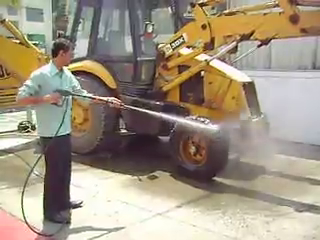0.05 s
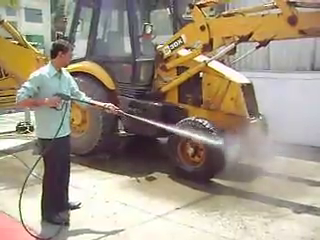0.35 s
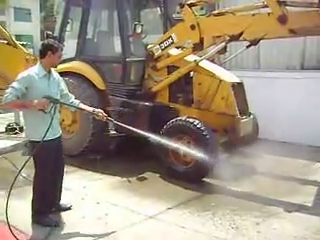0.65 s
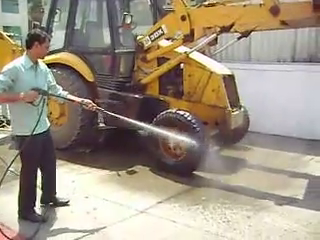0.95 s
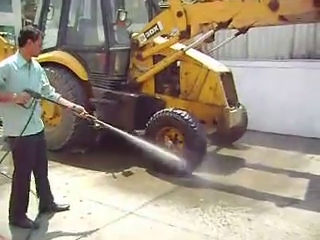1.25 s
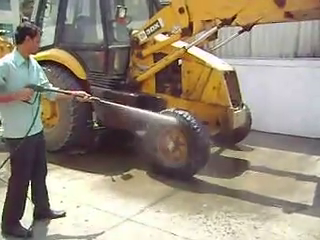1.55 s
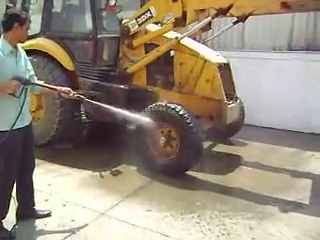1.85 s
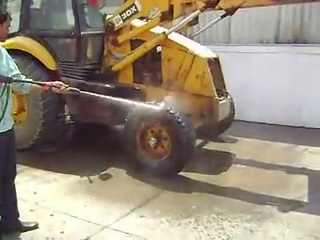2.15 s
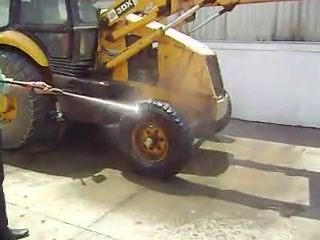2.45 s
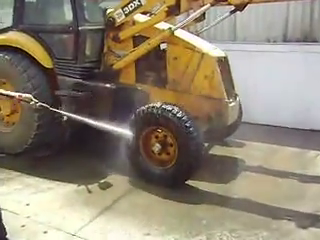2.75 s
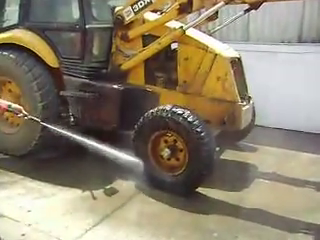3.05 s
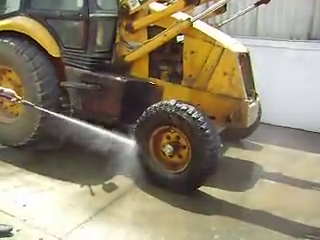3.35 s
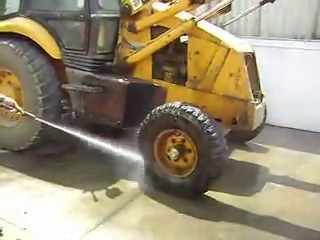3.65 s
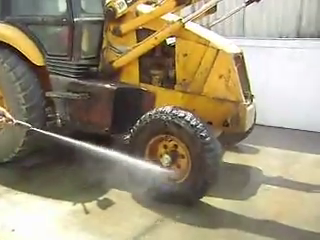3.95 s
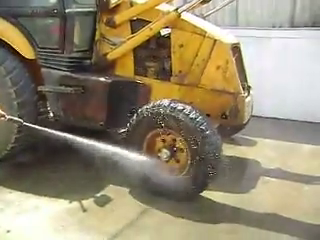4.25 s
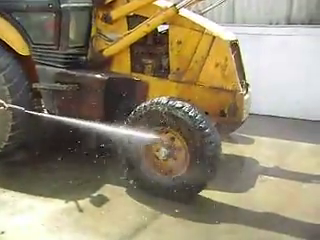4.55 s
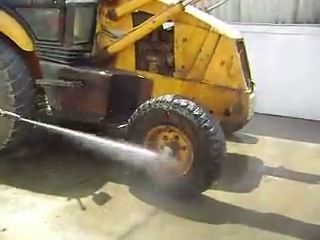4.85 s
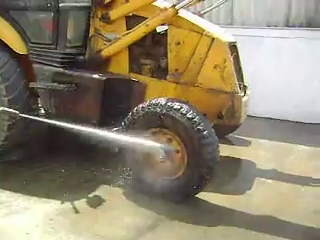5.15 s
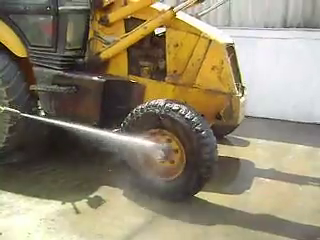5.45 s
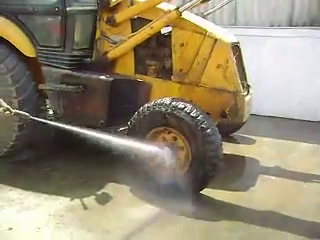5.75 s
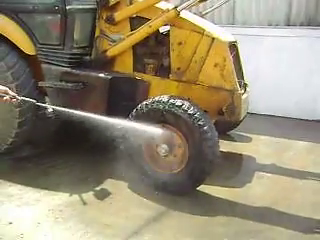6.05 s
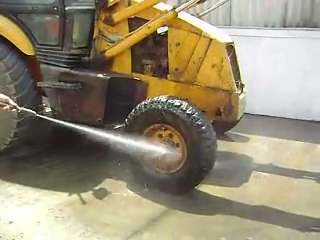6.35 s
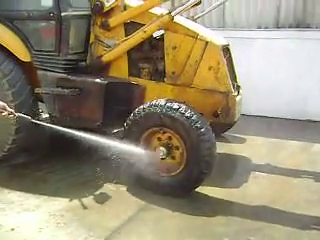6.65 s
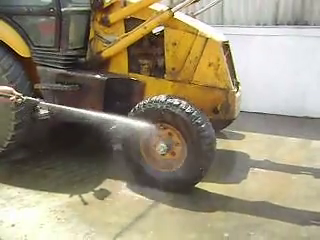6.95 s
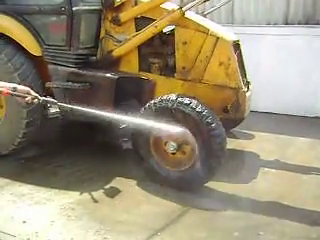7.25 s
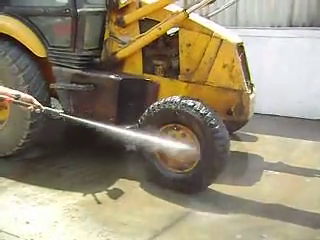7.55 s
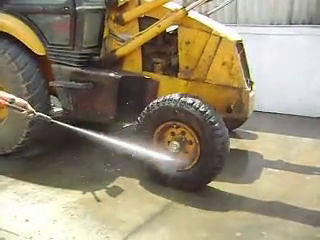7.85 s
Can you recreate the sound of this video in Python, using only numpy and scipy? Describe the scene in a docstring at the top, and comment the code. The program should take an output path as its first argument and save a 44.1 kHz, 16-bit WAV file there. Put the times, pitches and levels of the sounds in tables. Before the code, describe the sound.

High-pressure water sprays steadily against a digger's wheel, with hollow, drumming surges on the metal and a faint motor whine behind.

```python
"""Pressure washing a digger's wheel

The jet hisses and spatters on the rubber tyre, roars hollowly in the dish of the wheel and drums on
the steel. The drops are thousands of random clicks, filtered to give them their tone. Behind them the pump
hums and whines and the concrete yard rumbles. A small microphone overloads on the loudest roars."""
import sys
import numpy as np
from scipy import signal
from scipy.fft import rfft, irfft, next_fast_len
from scipy.io import wavfile

SR = 44100
rng = np.random.default_rng(int(sys.argv[2]) if len(sys.argv) > 2 else 0)


def wav_record(signal):
    """Record a signal, one row per channel, as 16-bit PCM in the file named by sys.argv[1]."""
    frames = np.transpose(np.atleast_2d(signal))
    bounded = np.clip(frames, -1, 1)
    # unit amplitude maps onto the largest positive 16-bit level
    quanta = np.round(bounded * 32767).astype(np.int16)
    wavfile.write(sys.argv[1], SR, quanta)


N = 357651
TIME = np.arange(N) / SR

# how the wheel's dish rings: (pitch [Hz], width [Hz], relative level [dB])
DISH_RINGS = [(589, 84, -3.5), (668, 92, -2), (794, 60, -1), (890, 81, -1), (1041, 100, -3.5),
              (1173, 110, -6)]
# how the hollow behind the hub rings: (pitch [Hz], width [Hz], relative level [dB])
HUB_RINGS = [(473, 59, -2), (553, 68, -2.5)]
# how the edge of the steel rim rings: (pitch [Hz], width [Hz], relative level [dB])
RIM_RINGS = [(1210, 80, 0), (1398, 130, -2), (1540, 77, -1), (1786, 130, -3.5)]
# the jet plunges into the dish, with relative levels: (start [s], length [s], roar [dB],
# air pocket pitch [Hz], pocket's share of the roar [0-1], hub [dB], rim [dB], disc [dB])
PLUNGES = [(1.416, .17, -28, 900, 0.1, -38, -29, -33.5), (2.999, .35, -23, 1012, .9, -44, -25.5, -43),
           (3.153, 0.083, -20.5, 980, 0.76, -47, -31, -40), (3.979, .095, -15, 1037, .6, -25, -20.5, -20),
           (4.199, 0.0802, -13, 957, 0, -22, -19.5, -18.5),
           (4.342, 0.0717, -9.5, 823, 0.6, -20, -19.5, -19), (4.467, 0.0667, -10, 775, 0.73, -13, -15, -26),
           (4.543, 0.0487, -17, 866, 0.15, -28, -21.5, -23.5),
           (4.766, 0.0597, -20, 980, 0.8, -34, -38, -23.5), (4.877, .16, -19, 926, 0.27, -25, -25.5, -23),
           (5.07, .24, -32, 900, 0.9, -25.5, -45, -32), (5.33, .125, -16, 738, .55, -23, -26.5, -37),
           (5.572, .16, -29, 800, 0.3, -29, -45, -28.5), (5.731, .10, -20, 800, 0.3, -25, -27.5, -40),
           (6.178, 0.0476, -9.5, 758, 0.61, -12, -26, -21.5),
           (6.24, 0.0415, -10.5, 883, 0.6, -17, -25, -20), (6.365, 0.127, -11, 879, 0.7, -17.5, -27, -19),
           (6.569, .095, -20.5, 850, 0, -22, -30, -21), (6.727, 0.049, -11.3, 833, .35, -19, -20.5, -17.5),
           (6.798, .075, -18, 850, 0, -23, -25, -33), (7.127, .035, -18, 888, .2, -38, -25, -36),
           (7.577, .125, -12.5, 918, 0.66, -27, -28, -22), (7.688, 0.14, -16, 922, 0.58, -23, -28, -19),
           (7.891, 0.13, -18.5, 906, 0.28, -23.5, -22.5, -19.5)]


def from_db(db):
    """Turn decibels into a number to multiply by."""
    return 10 ** (np.asarray(db) / 20)


def unit_power(x):
    """Scale a sound to an average power of 1."""
    return x / np.sqrt(np.mean(x ** 2) + 1e-20)


def over_time(rows):
    """Join a table's timed points with straight lines: one curve for each column after the time."""
    times, *columns = np.transpose(rows)
    return [np.interp(TIME, times, column) for column in columns]


def drift(per_s):
    """A smooth random wobble of size about 1, changing about per_s times a second."""
    step, warm_up = 40, 2000
    r = np.exp(-2 * np.pi * step * per_s / SR)
    noise = rng.standard_normal(N // step + warm_up + 2)
    slow = signal.lfilter([1], [1, -2 * r, r * r], noise)[warm_up:]
    return np.interp(np.arange(N) / step, np.arange(len(slow)), unit_power(slow))


def coloured(x, colour):
    """Make some pitches louder and others softer, along a curve of (pitch [Hz], gain [dB])."""
    size = next_fast_len(N + SR // 10)
    hz, db = np.transpose(colour)
    bin_hz = np.maximum(np.arange(size // 2 + 1) * SR / size, 1)
    bass_cut = np.minimum(bin_hz / hz[0], 1) ** 2
    gain = from_db(np.interp(np.log(bin_hz), np.log(hz), db))
    return irfft(rfft(x, size) * bass_cut * gain, size)[:N]


def ring(x, rings):
    """An object shaken by x rings at its own pitches; narrower ones ring longer."""
    total = 0
    for k, (hz, width_hz, db) in enumerate(rings):
        r = np.exp(-np.pi * width_hz / SR)
        feedback = [1, -2 * r * np.cos(2 * np.pi * hz / SR), r * r]
        ringing = signal.lfilter(np.array([1, 0, -1]) * (1 - r * r) / 2, feedback, x)
        total = total + (-1) ** k * from_db(db) * ringing
    return unit_power(total)


def drops(per_s, spread_db):
    """Water drops hit at random moments; the more spread, the more the heavy ones stand out."""
    sizes = from_db(spread_db * np.minimum(rng.exponential(1, N), 5))
    hits = rng.random(N) < per_s / SR
    return unit_power(hits * sizes * rng.choice([-1, 1], N))


def shower(colour, per_s, spread_db):
    """So many drops land that they blur into a hiss of the given tone colour."""
    return unit_power(coloured(drops(per_s, spread_db), colour))


def water_lumps():
    """Lumps of water strike softly, so they carry little treble."""
    soft = signal.butter(2, [300, 1900], "band", fs=SR, output="sos")
    return signal.sosfilt(soft, drops(per_s=3500, spread_db=2.0))


def air_pocket(hz, width_hz):
    """Churning water makes a pocket of air ring with a breathy note."""
    smooth = signal.butter(2, width_hz / 2, fs=SR, output="sos")
    swell = signal.sosfilt(smooth, rng.standard_normal((2, N)))
    phase = 2 * np.pi * np.cumsum(hz) / SR
    return unit_power(swell[0] * np.cos(phase) + swell[1] * np.sin(phase))


def wheel_disc():
    """Water drums on the steel disc of the wheel."""
    # how the disc rings: (pitch [Hz], width [Hz], relative level [dB])
    disc_rings = [(102, 73, -12.5), (149.5, 13, 1), (189.5, 17, 1), (217, 28, -2.5), (254.4, 20, -.5),
                  (285.6, 17, 0), (368, 58, -8)]
    return ring(drops(per_s=1500, spread_db=0), disc_rings)


def jet_rush():
    """The jet rushes on the tyre, growing louder and hollower as it moves onto the wheel."""
    # the rush on the way from tread to wheel: (time [s], relative level [dB])
    rush_levels = [(0, -23), (1.1, -22.5), (1.3, -23.5), (1.5, -22), (1.9, -22), (2.6, -23.5), (3.05, -20),
                   (3.45, -20.5), (3.8, -21.5), (4.13, -18), (4.6, -17), (5.45, -19), (5.62, -19),
                   (5.9, -17), (6.1, -18), (6.6, -17), (7.02, -19), (8.11, -17)]
    # tone of water on rubber: (pitch [Hz], gain [dB])
    tyre_colour = [(60, -19.5), (150, -12.5), (280, -9), (430, -6), (560, -5), (700, -0.5), (830, -4.5),
                   (960, -1), (1200, -4), (1450, -9), (1800, -12.5), (2800, -28)]
    rush_db, = over_time(rush_levels)
    wheel_share = 1 / (1.5 + np.exp((-16.5 - rush_db) / 2))
    tyre = shower(tyre_colour, per_s=5000, spread_db=2.5)
    wheel = (ring(water_lumps(), DISH_RINGS)
             + from_db(-10) * air_pocket(hz=np.full(N, 915), width_hz=120)
             + from_db(-10) * ring(water_lumps(), HUB_RINGS)
             + from_db(-11.5) * ring(water_lumps(), RIM_RINGS)
             + from_db(-11.5) * wheel_disc())
    return from_db(rush_db) * (np.sqrt(1 - wheel_share) * tyre + np.sqrt(wheel_share) * wheel)


def spray():
    """The landing spray hisses in three bands (low, middle, high), as coloured by the microphone."""
    # relative level of each hiss band: (time [s], low [dB], middle [dB], high [dB])
    hiss_levels = [(0, -27.5, -30, -31), (.6, -27.5, -31.5, -34), (1.3, -28, -32, -33.5),
                   (1.52, -25, -28, -30.5), (2.0, -25, -31, -28.5), (2.35, -26, -29, -26),
                   (2.62, -26, -28, -24), (2.85, -25, -30.5, -28.5), (3.23, -22, -27.5, -26.5),
                   (3.5, -24.7, -29, -27.5), (4.4, -22.5, -26.5, -27.5), (4.6, -21.5, -24, -23.5),
                   (4.82, -21, -26.5, -27.5), (5.35, -21.5, -25.5, -24.5), (5.58, -23, -27.5, -27.5),
                   (5.8, -21.5, -25.5, -26), (6.55, -23.5, -28, -27.5), (6.85, -22.5, -26.5, -26.5),
                   (7.14, -20.5, -26, -24.5), (7.35, -23.5, -26.5, -27.5), (8.11, -22, -27, -27.5)]
    # tone of each hiss band: (pitch [Hz], gain [dB])
    low_colour = [(900, -16), (1350, -7), (1650, -4.5), (2050, -0.5), (2450, -3.5), (2800, -8.5),
                  (3500, -22), (5000, -44.5)]
    middle_colour = [(1800, -32.5), (2600, -6.5), (3000, -3.5), (3450, -0.5), (4000, -3.5), (4500, -3),
                     (5500, -27.5)]
    high_colour = [(3000, -32.5), (4000, -12.5), (4500, -2.5), (4750, 0), (4970, -0.2), (5200, -3),
                   (5500, -7), (6000, -13)]
    low_db, middle_db, high_db = over_time(hiss_levels)
    *_, rim_db, _ = np.transpose(PLUNGES)
    thrown_back = plunge_gain(rim_db - 10.5)   # the rim throws back extra spray in each plunge
    low_gain = np.hypot(from_db(low_db - 1), thrown_back)
    low = low_gain * shower(low_colour, per_s=10000, spread_db=3)
    middle = from_db(middle_db + 0.14) * shower(middle_colour, per_s=12000, spread_db=2.5)
    high = from_db(high_db + 1.1) * shower(high_colour, per_s=10000, spread_db=4)
    return low + middle + high


def wavering_tone(hz, db, wander, waver_db):
    """A pure note that wavers a little in pitch and loudness."""
    phase = 2 * np.pi * np.cumsum(hz * (1 + wander * drift(5.8))) / SR
    return from_db(db + waver_db * drift(7)) * np.sin(phase)


def pump():
    """The pump hums, slowly sagging in pitch, and its motor gives a thin whine."""
    # notes of the hum: (pitch at speed 1 [Hz], relative level [dB], wander [share of pitch])
    hum_notes = [(54, -54, .01), (82, -53, .01), (344, -37, .007), (759, -44, .003)]
    # the pump swells and fades as the microphone moves: (time [s], hum gain [dB], whine gain [dB])
    pump_gains = [(0, 1, -2), (.6, -0.5, -3), (1.6, 6, -2.5), (2.3, -1, -1.5), (2.7, 1, 2.5), (3.1, 3.5, 0),
                  (3.9, -1, -3.5), (5.6, 2, -2), (6.2, 4, 3), (8.11, 8.5, 0)]
    hum_db, whine_db = over_time(pump_gains)
    speed = 1.005 - .0017 * TIME
    hum = sum(wavering_tone(hz * speed, db, wander, waver_db=1.5) for hz, db, wander in hum_notes)
    whine = wavering_tone(hz=3724, db=whine_db - 38, wander=0.00058, waver_db=2.5)
    return from_db(hum_db) * hum + whine


def yard_rumble():
    """The yard and the moving air make a dull rumble under everything."""
    # how the rumble rises and falls: (time [s], level [dB])
    rumble_levels = [(0, -42), (2.9, -39.5), (3.45, -31.5), (3.75, -41), (4.1, -34.5), (6.6, -34.5),
                     (7.2, -40), (7.75, -33), (8.11, -39)]
    # tone of the rumble: (pitch [Hz], gain [dB])
    rumble_colour = [(15, -5.5), (35, -3.5), (60, -1), (120, -7), (200, -3), (400, -25), (1000, -58.5)]
    rumble_db, = over_time(rumble_levels)
    return from_db(rumble_db) * unit_power(coloured(rng.standard_normal(N), rumble_colour))


def spits():
    """An edge of the tread or rim splits the jet into a short, bright burst of drops."""
    # the jet catches an edge: (time [s], level [dB], fade on either side [s])
    edge_hits = [(0.371, -19.5, 0.0092), (1.738, -21.5, 0.016), (2.03, -23.5, 0.015), (2.303, -20, .015),
                 (2.395, -18, .009), (2.442, -17.5, .012), (2.974, -20, .009), (3.08, -21.5, .008),
                 (3.915, -17, 0.0077), (4.671, -20, 0.021), (4.719, -22.5, 0.015), (5.764, -20, 0.024),
                 (7.055, -24, 0.0078), (7.142, -16, 0.0084)]
    # tone of a burst: (pitch [Hz], gain [dB])
    spit_colour = [(1200, -18), (2400, -10.5), (3400, 0), (5000, -0.5), (6000, -11)]
    swell = sum(from_db(db) * np.exp(-((TIME - at) / fade) ** 2) for at, db, fade in edge_hits)
    return swell * shower(spit_colour, per_s=9000, spread_db=3)


def plunge_gain(levels_db, rise_s=0.0083, fade_s=0.012):
    """Each plunge swells, holds and dies away as the jet slides in over the rim and out again."""
    power = 0
    for (start, length, *_), db in zip(PLUNGES, levels_db):
        rise = np.clip(.5 + (TIME - start) / rise_s, 0, 1)
        fall = np.exp(-np.clip((TIME - start - length) / fade_s, 0, 20))
        power = power + (from_db(db) * rise * fall) ** 2
    return np.sqrt(power)


def plunge_roars():
    """Deep in the dish the jet roars in a pocket of air and sets the hub, rim and disc ringing."""
    start, length, roar_db, pocket_hz, pocket_share, hub_db, rim_db, disc_db = np.transpose(PLUNGES)
    middle = start + length / 2
    sloshing = 1 + .07 * drift(25)   # water keeps changing the size of the pocket
    pitch = np.interp(TIME, middle, pocket_hz) * sloshing
    share = np.clip(np.interp(TIME, middle, pocket_share), 0, 1)
    dish = np.sqrt(1 - share) * ring(water_lumps(), DISH_RINGS)
    pocket = np.sqrt(share) * air_pocket(pitch, width_hz=150)
    roar = plunge_gain(roar_db) * (dish + pocket)
    hub = plunge_gain(hub_db - 2) * ring(water_lumps(), HUB_RINGS)
    rim = plunge_gain(rim_db + 1) * ring(water_lumps(), RIM_RINGS)
    # water thrown round inside the rim drums on a little longer
    disc = plunge_gain(disc_db - 1, fade_s=0.081) * wheel_disc()
    return roar + hub + rim + disc


def tyre_thrum(level_db, at_s, fade_s):
    """The tyre wall gives a deep thrum while the jet meets the tread head-on."""
    # how the tyre wall rings: (pitch [Hz], width [Hz], relative level [dB])
    wall_rings = [(48, 20, -13), (85, 16, 1)]
    swell = np.exp(-((TIME - at_s) / fade_s) ** 2)
    return from_db(level_db) * swell * ring(rng.standard_normal(N), wall_rings)


def scene():
    """Mix the jet, tyre, pump and yard into one channel."""
    rush = from_db(-.5) * jet_rush()
    roars = from_db(-1.52) * plunge_roars()
    water = spray() + spits()
    flutter = from_db(0.75 * drift(per_s=39))   # the jet arrives in uneven lumps
    jet = flutter * (rush + roars + water)
    thrum = tyre_thrum(level_db=-35, at_s=3.3, fade_s=0.22)
    return (jet + thrum + pump() + yard_rumble())[None]


def record(dry):
    """The microphone picks up little above 6 kHz; the loudest peaks are then flattened and crackle."""
    # the microphone's steep treble loss: (pitch [Hz], gain [dB])
    mic_colour = [(5200, 0.5), (5600, -1), (5900, -8), (6150, -16), (6400, -43.5), (6700, -84)]
    # a gentle dip in the treble after the overload: (pitch [Hz], gain [dB])
    treble_dip = [(5800, 0), (6700, -5.5), (8000, -3), (10000, 0), (15000, 0)]
    peak_limit, cutoff_hz = .72, 16600
    keep_bass = [(1, 0)]
    narrow = coloured(dry[0], keep_bass + list(mic_colour))
    overloaded = np.clip(narrow, -peak_limit, peak_limit)
    softened = coloured(overloaded, keep_bass + list(treble_dip))
    top_cut = signal.cheby2(20, 60, cutoff_hz, fs=SR, output="sos")
    return signal.sosfilt(top_cut, softened)[None]


dry = scene()
out = record(dry)
wav_record(out)
```